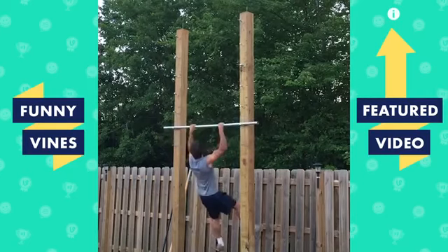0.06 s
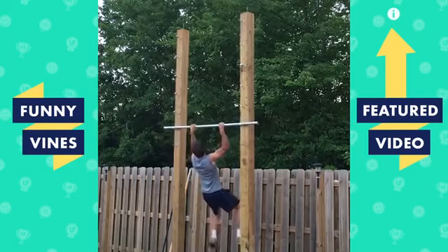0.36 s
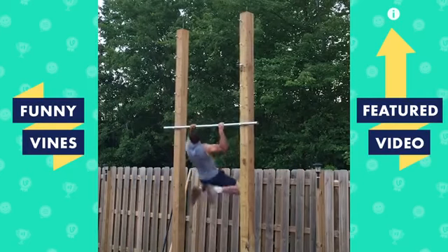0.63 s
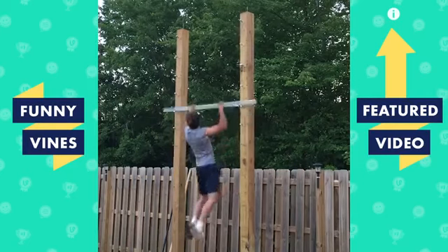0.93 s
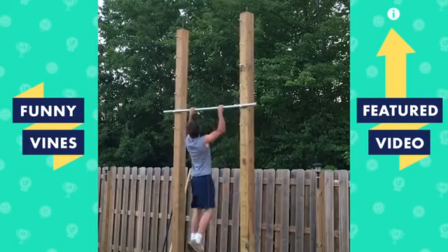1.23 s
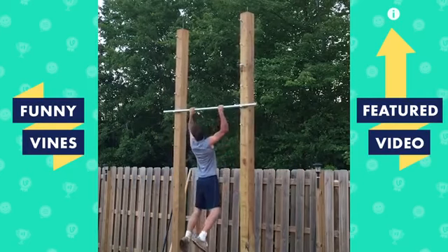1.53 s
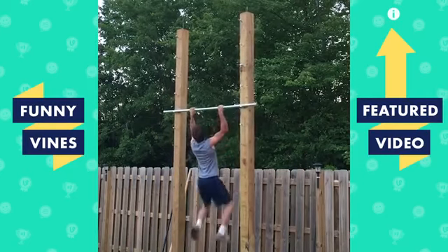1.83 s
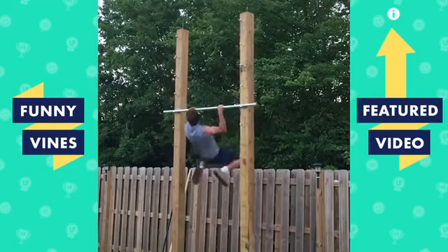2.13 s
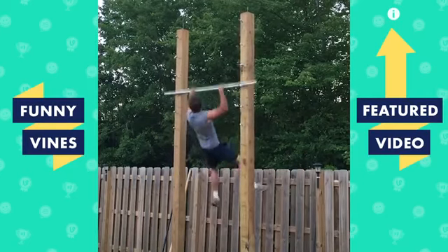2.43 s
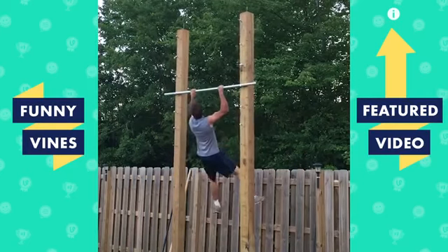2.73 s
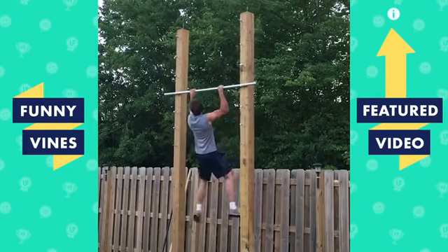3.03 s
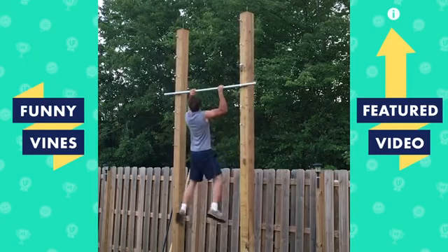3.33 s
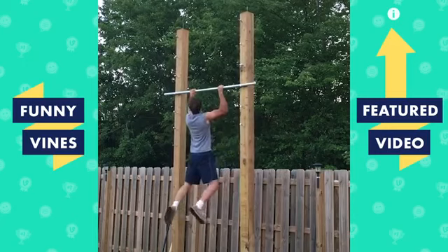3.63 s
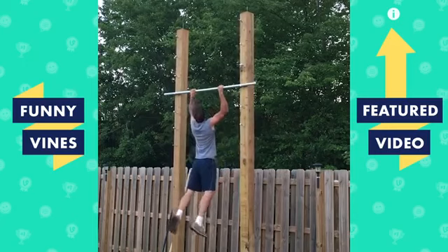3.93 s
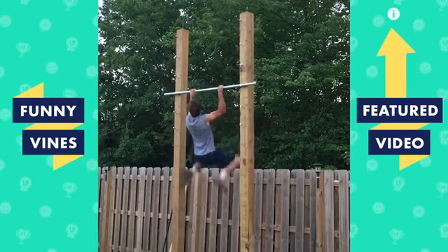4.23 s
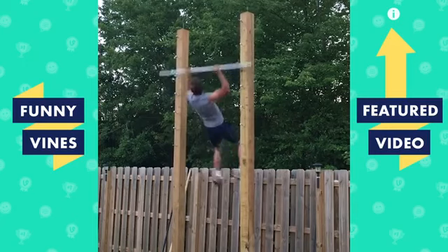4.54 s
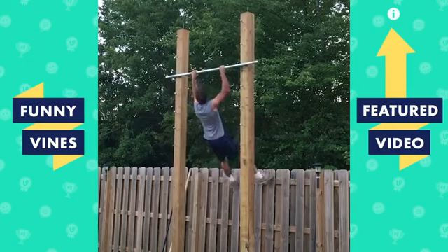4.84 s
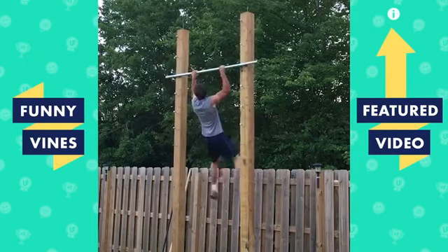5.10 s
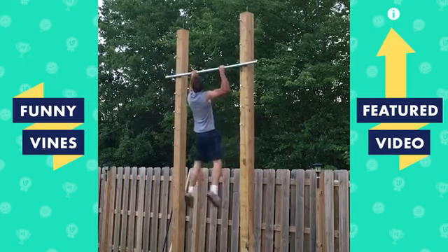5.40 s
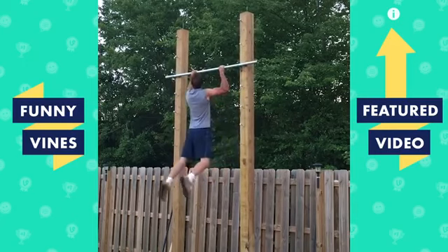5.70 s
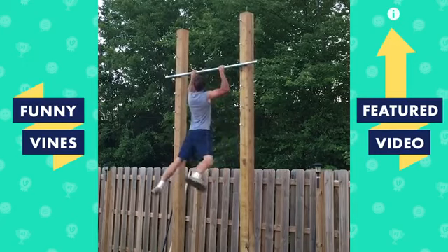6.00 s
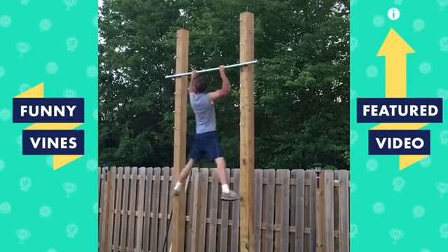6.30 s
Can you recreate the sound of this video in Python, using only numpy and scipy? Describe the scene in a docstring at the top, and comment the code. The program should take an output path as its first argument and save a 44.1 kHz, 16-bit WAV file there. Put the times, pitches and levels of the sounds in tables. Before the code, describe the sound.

In a backyard, a steel bar is jumped up pegs on two wooden posts. It lands four times, each a quick cluster of wooden knocks and sharp metal clashes with a brief ring and a light echo. Small clinks come just before some landings as the bar leaves its pegs. A distant engine drones underneath, rising in pitch and then settling, over a low rumble.

```python
"""A steel bar clinks off its pegs and slams into two wooden posts as an athlete jumps it up, four times.
Each impact excites damped modes of wood and steel; the backyard's fence and trees reflect the sound.
Between landings the loaded bar slips and creaks on its pegs. A distant engine drones, rising and
falling with its firing rate, over a low rumble, faint machine hum, leaves and insects."""
import sys
import numpy as np
from scipy import signal
from scipy.fft import rfft, irfft, next_fast_len
from scipy.io import wavfile
from scipy.ndimage import map_coordinates

SR = 44100
rng = np.random.default_rng(int(sys.argv[2]) if len(sys.argv) > 2 else 0)


def materialize(psi):
    """Save the field psi as 16-bit PCM at rate SR to the path in sys.argv[1].

    A 1-D psi becomes a single channel; in a 2-D psi each row is a channel.
    """
    bounded = np.clip(np.atleast_2d(psi).T, -1, 1)
    quanta = np.round(bounded * 32767).astype(np.int16)
    wavfile.write(sys.argv[1], SR, quanta)


N = 289296

# Impacts on posts and pegs. Each row: start in seconds, wood gain in dB, steel gain in dB,
# favoured pitch in Hz.
IMPACTS = [(.134, -15, -30, 3505), (.140, -13.5, -23, 1286), (.148, -11, -45, 1350),
           (.182, -22.5, -20.5, 313), (.190, -18, -24, 1227), (1.169, -18, -37, 378.6),
           (1.192, -12, -23, 4700), (1.201, -16.5, -38, 1602), (1.213, -18, -38.5, 374),
           (1.226, -23, -18, 1331), (1.234, -24, -20.5, 289.5), (2.666, -16, -42.5, 180),
           (2.676, -13.5, -27, 4200), (2.716, -15.5, -18.5, 3977), (2.728, -17, -34, 1195),
           (2.736, -22.5, -25, 177), (4.879, -14.5, -36, 660), (4.884, -16.5, -32.5, 721.5),
           (4.89, -16, -45.5, 178.3), (4.907, -25.5, -23.5, 1600), (4.919, -21, -16, 3658),
           (4.938, -24.5, -26, 892)]
# The bar shifts on its pegs or leaves them. Each row: start in seconds, click gain in dB,
# ring gain in dB, seconds until the grip damps it, favoured pitch in Hz.
PEG_SLIPS = [(.003, -37.5, -50, 0.2, 3260), (.844, -71, -64.5, 0.014, 2600),
             (.948, -81, -62.5, 0.0076, 1290), (1.006, -51, -59, 0.023, 4400),
             (1.905, -64, -62, 0.013, 2000), (1.995, -78, -65, 0.029, 1290),
             (2.496, -24, -35.5, .088, 1200), (4.717, -26, -47, 0.22, 2584), (6.51, -55, -80, .02, 3260)]
# The engine's course. Each row: time in seconds, firing rate in Hz, gain in dB.
ENGINE_COURSE = [(0, 42.03, -33.5), (.3, 49.98, -40.5), (.85, 68.06, -34.5), (1.5, 97, -31.5),
                 (2.05, 127, -34), (2.3, 127, -36), (2.75, 100.4, -34), (2.9, 93.78, -27.5),
                 (3.08, 92.64, -24.5), (3.38, 90.6, -28), (3.55, 84.4, -34.5), (3.75, 87.64, -23),
                 (4.03, 92.64, -33), (4.22, 94.13, -25.5), (4.5, 98.7, -40), (4.82, 97.95, -25.5),
                 (5.03, 99.2, -48), (5.3, 104, -41), (6, 100, -54.5), (6.56, 97.2, -43)]


def amp(db):
    return 10 ** (np.asarray(db) / 20)


def along(points, hz):
    """Interpolate rows of frequency and value on a logarithmic frequency axis."""
    f, v = np.transpose(points)
    return np.interp(np.log(hz + 1), np.log(f + 1), v)


def curves(rows):
    """Interpolate each column after the time to one value per sample."""
    s, *cols = np.transpose(rows)
    return [np.interp(np.arange(N) / SR, s, c) for c in cols]


def wobble(rate):
    """Slow random modulation: a spline with `rate` knots a second."""
    return map_coordinates(rng.standard_normal(int(N * rate / SR) + 4), [np.arange(N) * rate / SR])


def noise(spectrum, size):
    """Spectral shaping turns white noise into coloured noise of rms 1."""
    gain = amp(along(spectrum, np.fft.rfftfreq(size, 1 / SR)))
    x = irfft(rfft(rng.standard_normal(size)) * gain, size)
    return x / np.sqrt(np.mean(x ** 2) + 1e-20)


def add(track, s, sound):
    """Superpose a sound on the track at s seconds."""
    part = track[max(round(s * SR), 0):][:len(sound)]
    part += sound[:len(part)]


def ring(modes, scatter_db, attack):
    """Free vibration is a sum of damped modes; each blow shares out its energy anew."""
    t = np.arange(SR // 2) / SR
    hz, db, t60 = np.transpose(modes)[:, :, None]
    level = amp(db + scatter_db * rng.standard_normal(hz.shape) - 60 * t / t60)
    phase = 2 * np.pi * rng.random(hz.shape)
    return (level * np.sin(2 * np.pi * hz * t + phase)).sum(0) * (1 - np.exp(-t / attack))


def burst(spectrum, t60, attack):
    """Dense, short-lived modes overlap into decaying noise."""
    t = np.arange(SR // 2) / SR
    return noise(spectrum, len(t)) * amp(-60 * t / t60) * (1 - np.exp(-t / attack))


def recolour(rows, gain_db):
    """Weight rows of frequency and level by a frequency-dependent gain."""
    hz, db, *rest = np.transpose(rows)
    return np.transpose([hz, db + gain_db(hz), *rest])


def focus(hz, centre_hz, lift_db=11.5, octaves=0.18):
    """The point of excitation favours the modes around one pitch."""
    return lift_db * np.exp(-(np.log2(hz / centre_hz) / octaves) ** 2)


def echo(x, decay, delay):
    """Diffuse reflection: convolution with a noise tail whose decay depends on frequency."""
    hz, t, spectra = signal.stft(rng.standard_normal(SR), SR, nperseg=256)
    tail = signal.istft(spectra * amp(-60 * t / along(decay, hz)[:, None]), SR)[1]
    tail = np.pad(tail / np.linalg.norm(tail), (int(delay * SR), 0))
    return signal.fftconvolve(x, tail)[:len(x)]


def yard(x, fence_db, trees_db):
    """Reverberation: the direct sound is followed by a short tail off the fence, a long one off trees."""
    # Decay times. Each row: frequency in Hz, T60 in seconds.
    fence_decay = [(200, 0.35), (1200, 0.2), (4000, 0.19), (10000, 0.3)]
    tree_decay = [(200, 0.2), (1300, 1.3), (4000, 0.92), (9500, 1), (15000, .75)]
    x = np.pad(x, (0, SR - len(x)))
    fence = amp(fence_db) * echo(x, fence_decay, delay=0.012)
    trees = amp(trees_db) * echo(x, tree_decay, delay=0.033)
    return x + fence + trees


def engine():
    """Periodic firing makes exhaust orders; the lowest two glide through the band that carries far."""
    # Transmission over the distance. Each row: frequency in Hz, gain in dB.
    exhaust_band = [(40, -28), (54, -9.5), (66, 1.5), (126, -2.5), (145, -11), (180, -27), (260, -28)]
    firing_hz, db = curves(ENGINE_COURSE)
    phase = 2 * np.pi * np.cumsum(firing_hz) / SR

    def order(k):
        dips_db = 1.86 * (1 - wobble(rate=18) ** 2)  # the level dips briefly at random
        return amp(db + along(exhaust_band, k * firing_hz) + dips_db) * np.sin(k * phase)

    return order(0.99) + amp(-2.5) * order(2)


def machine_hum():
    """Far machines radiate a slightly wavering line spectrum; a further low drone joins late."""
    # Spectral lines. Each row: frequency in Hz, rms level in dB.
    partials = [(59.2, -59), (119, -63), (177.6, -70), (296.1, -71.5), (355.3, -72), (414.5, -77.5)]
    t = np.arange(N) / SR

    def line(hz, db):
        return amp(db + 0.37 * wobble(3.5)) * np.sin(2 * np.pi * hz * t + 0.1 * wobble(4.4))

    join_s, rise_s = 5.7, 0.36
    drone = np.clip((t - join_s) / rise_s, 0, 1) * line(hz=78, db=-51)
    return drone + np.sqrt(2) * sum(line(hz, db) for hz, db in partials)


def outdoors():
    """Amplitude-modulated noise bands: low rumble, insects, leaves in a light breeze,
    and a soft wash of reverberation fading after each landing."""
    # Noise spectra. Each row: frequency in Hz, relative density in dB.
    rumble_band = [(18, -41.5), (30, -18.5), (55, -2), (100, 5), (135, -7.5), (200, -17.5), (350, -27),
                   (600, -56.5), (2000, -120)]
    leaf_band = [(150, 9.5), (350, -4), (550, 0.5), (900, -1.5), (1300, 0.5), (1800, -7), (2700, -14),
                 (3700, -17), (5200, -23), (8000, -27.5), (9300, -25), (12000, -37.5), (15000, -52)]
    insect_band = [(4000, -88), (5900, -8), (6250, -4.5), (6550, -13.5), (8000, -92)]
    t = np.arange(N) / SR
    engine_db = curves(ENGINE_COURSE)[1]
    swell_db, gust_db, pulse_db = 0.8 * wobble(7), 0.7 * wobble(9), 0.8 * wobble(6)
    follow_db = 0.11 * (engine_db - engine_db.mean())
    rumble = amp(-45 + follow_db + swell_db) * noise(rumble_band, N)
    breeze = amp(-61 - 0.5 * t + gust_db)  # slowly dying
    landing_tails = [(t > s) * amp(wood_db - 46.5 - 15 * np.abs(t - s)) for s, wood_db, *_ in IMPACTS]
    wash = np.linalg.norm([breeze, *landing_tails], axis=0) * noise(leaf_band, N)  # powers add
    insects = amp(-82 + pulse_db) * noise(insect_band, N)
    return rumble + wash + insects


def slips():
    """Slipping on a peg, the bar scrapes, clicks and vibrates freely until the grip damps it."""
    # Modes of the bar clear of the pegs. Each row: frequency in Hz, level in dB, T60 in seconds.
    free_modes = [(910, 0, 0.13), (1288, 1, 0.44), (1987, -9.5, 0.14), (2575, -13, 0.22), (3262, -16, 0.38),
                  (3500, -21, .18), (3880, -15, .15), (4430, -19.5, 0.36), (5700, -16.5, .2)]
    # Contact spectrum. Each row: frequency in Hz, relative density in dB.
    click_band = [(100, -36.5), (600, -7.5), (950, -2), (1500, -2), (2100, 4.5), (2400, -3), (2900, -4),
                  (3400, 2), (3900, 3.5), (4300, -6.5), (4900, -4), (6100, -9.5), (7000, -19.5),
                  (8300, -21.5), (9600, -16), (12000, -22.5), (15000, -35.5)]
    out, t = np.zeros(N), np.arange(SR // 2) / SR
    scrape_lead_s, grip_t60_s = 0.021, 0.039
    for s, click_db, ring_db, free_s, hz in PEG_SLIPS:
        grip = amp(-60 * np.maximum(t - free_s, 0) / grip_t60_s)
        tone = grip * ring(recolour(free_modes, lambda f: focus(f, hz)), scatter_db=1, attack=0.002)
        click = burst(click_band, t60=0.046, attack=0.0024)
        scrape = burst(click_band, t60=0.083, attack=0.003)
        add(out, s - scrape_lead_s, amp(click_db - 31.5) * scrape)
        add(out, s, amp(ring_db) * tone)
        add(out, s, amp(click_db) * yard(click, fence_db=-6.5, trees_db=-16.5))
    return out


def singing():
    """Two close, lightly damped bar modes beat after each slip and each landing's hardest clash."""
    # Each row: frequency in Hz, level in dB, T60 in seconds.
    mode_pair = [(3230, -3, .85), (3238, -10, 0.99)]
    out = np.zeros(N)
    clashes = [(s, steel_db) for s, _, steel_db, _ in IMPACTS]
    hardest = lambda s: max(db for at, db in clashes if abs(at - s) < 0.1)
    jolts = [(s, db) for s, db in clashes if db == hardest(s)]
    jolts += [(s, click_db) for s, click_db, *_ in PEG_SLIPS]
    for s, db in jolts:
        add(out, s, amp(db - 26.5) * ring(mode_pair, scatter_db=3, attack=0.01))
    return out


def creaks():
    """Stick-slip friction on the pegs makes faint random creaks that re-excite the bar's main mode."""
    out = np.zeros(N)
    creaks_per_s, fade_db_per_s = 16, 5
    main_mode = (1290, -5.5, 0.45)  # frequency in Hz, level in dB, T60 in seconds
    starts = np.cumsum(rng.exponential(1 / creaks_per_s, size=150))
    for s, (strength, pitch) in zip(starts[starts < N / SR], rng.standard_normal((len(starts), 2))):
        creak_mode = (1420 * 2 ** (0.3 * pitch), 0, 0.047)
        db = -54 + 3.3 * strength - fade_db_per_s * s
        add(out, s, amp(db) * ring([creak_mode, main_mode], scatter_db=2, attack=0.004))
    return out


def landings():
    """Impact excitation: each contact thumps a post and clashes steel on steel with a sharp crack."""
    # Modes of the loaded posts and landing bar. Each row: frequency in Hz, level in dB, T60 in seconds.
    post_modes = [(177, -18.5, 0.29), (282.7, -8, 0.22), (330, -12.5, .11), (392, -14, 0.16),
                  (517, -19, 0.17), (616.8, -5.5, 0.11), (660, -5, 0.097), (816, -4.5, 0.05),
                  (885, 2, 0.097), (946, -1, 0.062), (1190, -9.5, 0.083), (1293, -8.5, 0.14),
                  (1350, -9.5, 0.15), (1528, -11, 0.086), (1694, -18.5, 0.3), (1930, -12, 0.12)]
    bar_modes = [(940, -15, 0.1), (1283, -4.5, .18), (1489, -8, 0.091), (1660, -14.5, 0.18),
                 (1975, -8.5, .11), (2700, -17.5, .1), (3396, -12, 0.088), (3850, -20.5, 0.092),
                 (4200, -15.5, 0.099), (4430, -16.5, 0.11), (5900, -26.5, .12), (6040, -27, .12)]
    # Impact spectra. Each row: frequency in Hz, relative density in dB.
    thud_band = [(60, -39), (150, -1.5), (300, -4), (450, -2.5), (700, 5), (1300, -7.5), (2200, -5),
                 (3200, -18), (6000, -40.5), (15000, -59)]
    clash_band = [(200, -4), (900, -2.5), (1400, 2.5), (2900, -5), (3500, -1.5), (4400, -2), (5200, -5.5),
                  (6100, -5), (7000, -16), (8400, -23.5), (9400, -9.5), (12000, -14), (14500, -29.5),
                  (16000, -37)]
    crack_band = [(300, -20.5), (1500, 0), (4000, 6), (7500, -5.5), (11000, -6), (14500, -9.5),
                  (16000, -17.5)]
    out = np.zeros(N)
    low_cut = signal.butter(2, 110, "highpass", fs=SR, output="sos")  # the thud is thinned below about 110 Hz
    for s, wood_db, steel_db, hz in IMPACTS:
        tilt_db_per_octave = 1.24 * np.log2(hz / 1500)  # a lower-pitched spot dulls the thud
        steel_colour = lambda f: focus(f, hz)
        wood_colour = lambda f: focus(f, hz) + tilt_db_per_octave * np.log2(f / 900)
        wood = amp(-6) * ring(recolour(post_modes, wood_colour), scatter_db=2.5, attack=0.00028)
        wood += amp(-1.5) * burst(recolour(thud_band, wood_colour), t60=0.071, attack=0.0015)
        steel = amp(-11) * ring(recolour(bar_modes, steel_colour), scatter_db=2.5, attack=0.00037)
        steel += amp(1.5) * burst(recolour(clash_band, steel_colour), t60=0.062, attack=0.00036)
        steel += amp(6) * burst(crack_band, t60=0.012, attack=0.0008)
        add(out, s, amp(wood_db) * yard(signal.sosfilt(low_cut, wood), fence_db=-16, trees_db=-36))
        add(out, s, amp(steel_db) * yard(steel, fence_db=-5, trees_db=-19.5))
    return out


def pings():
    """Delayed reflection: each steel clash returns from across the yard as a thin, high ping."""
    # Echo spectrum. Each row: frequency in Hz, relative density in dB.
    ping_band = [(7500, -54), (9100, 1), (9550, -1), (10100, -17), (12000, -49)]
    out = np.zeros(N)
    round_trip_s = 0.146
    for s, _, steel_db, _ in IMPACTS:
        add(out, s + round_trip_s, amp(steel_db - 28.5) * burst(ping_band, t60=0.1, attack=0.0011))
    return out


def scene():
    """Superposition: the pressures of all sources add in one channel."""
    bar = landings() + pings() + singing() + slips() + creaks()
    return (bar + engine() + machine_hum() + outdoors())[None]


def record(dry):
    """Soft saturation rounds the highest peaks; a low-pass then limits the bandwidth."""
    ceiling, top_hz = 0.5, 15400
    rounded = dry / (1 + np.abs(dry / ceiling) ** 6) ** (1 / 6)
    size = next_fast_len(N + SR)
    passband = np.fft.rfftfreq(size, 1 / SR) < top_hz
    return irfft(rfft(rounded, size) * passband, size)[:, :N]


dry = scene()
out = record(dry)
materialize(out)
```